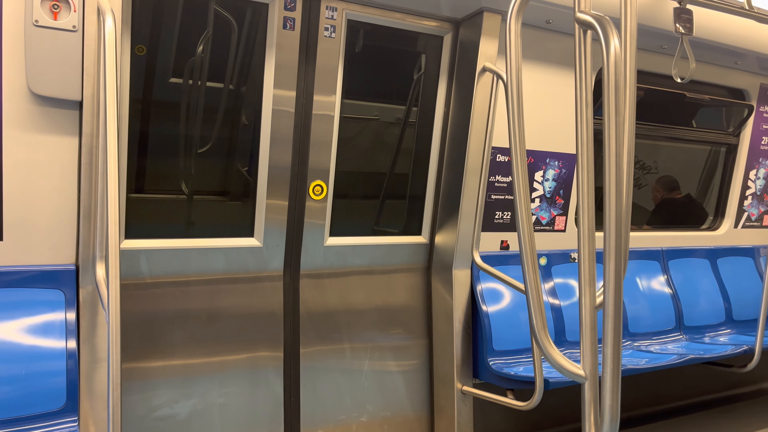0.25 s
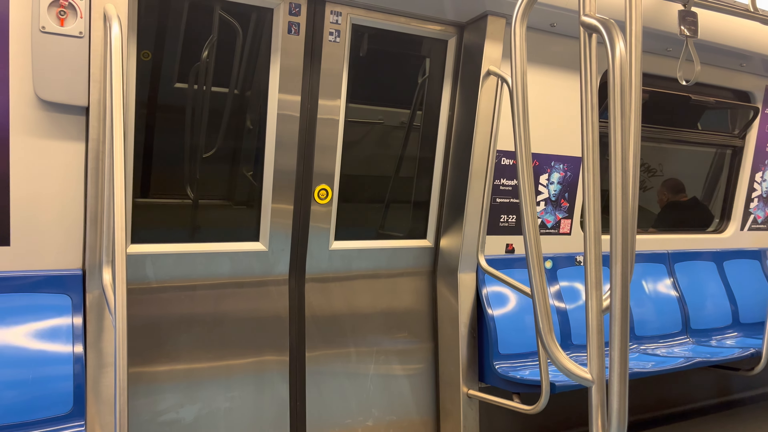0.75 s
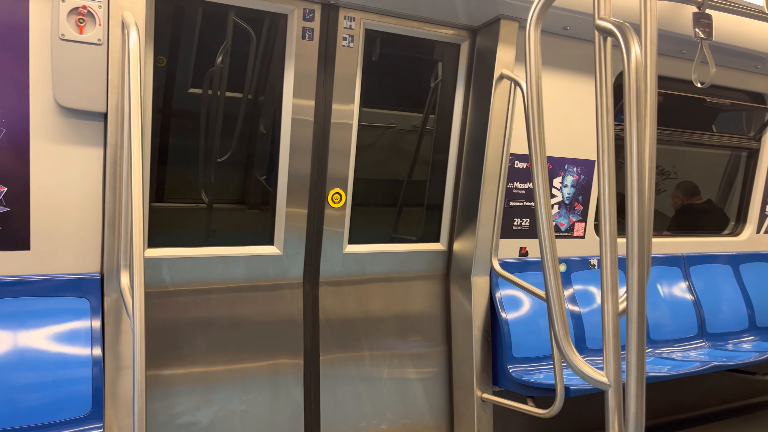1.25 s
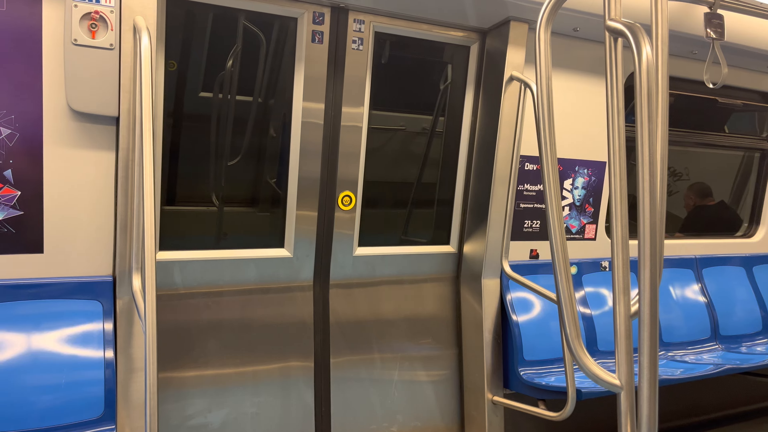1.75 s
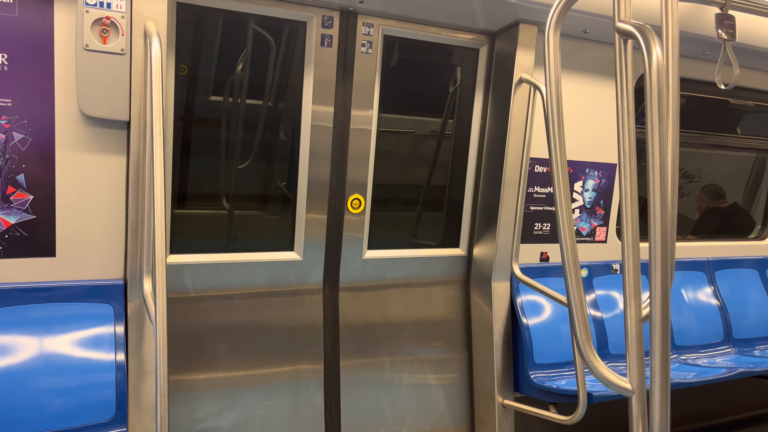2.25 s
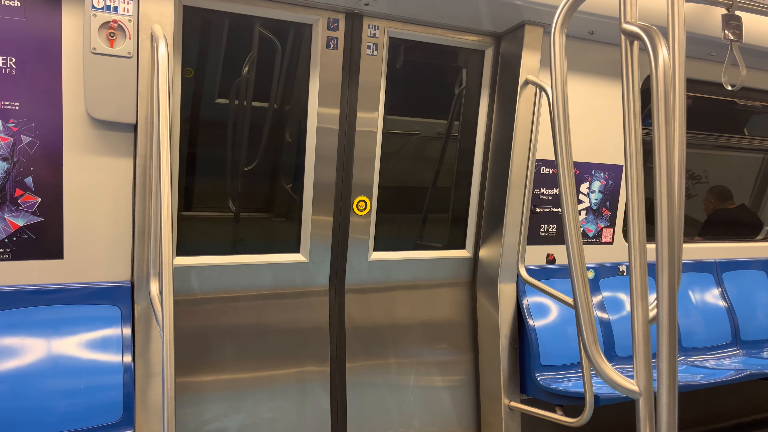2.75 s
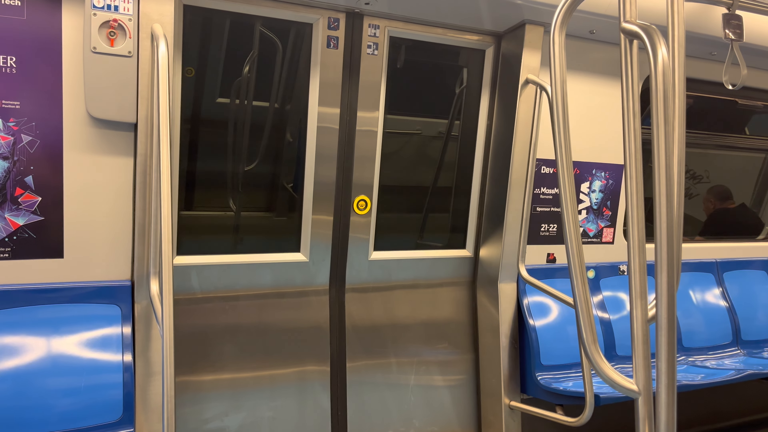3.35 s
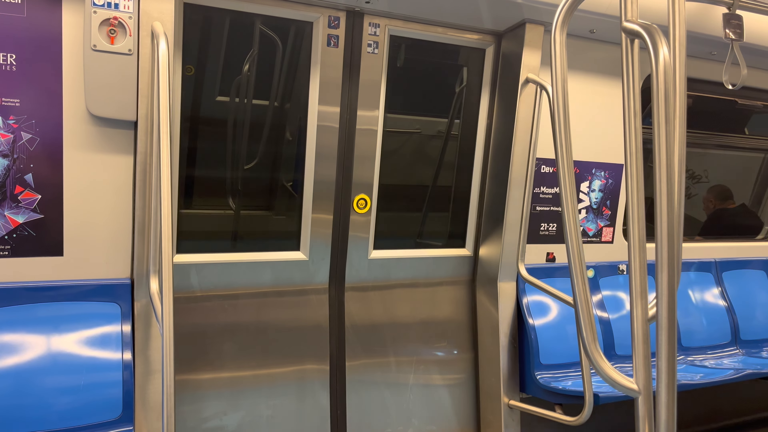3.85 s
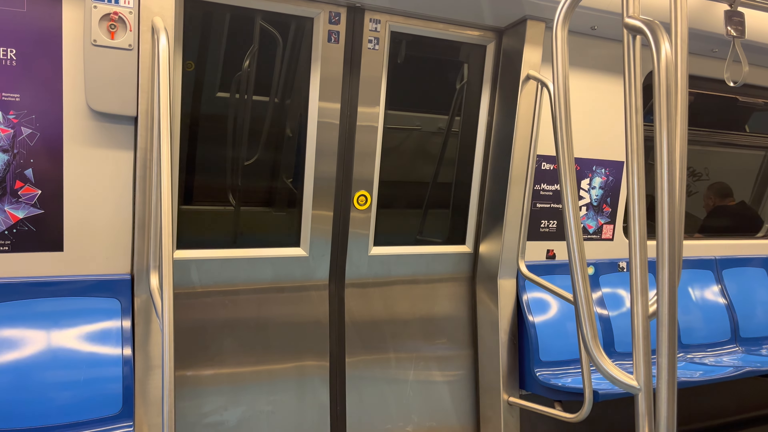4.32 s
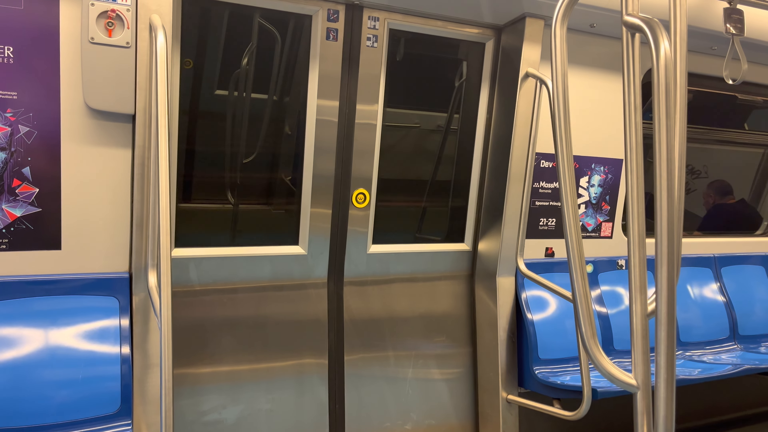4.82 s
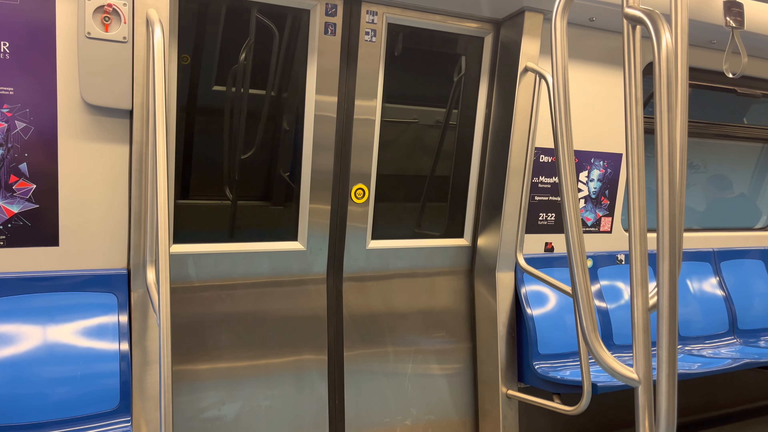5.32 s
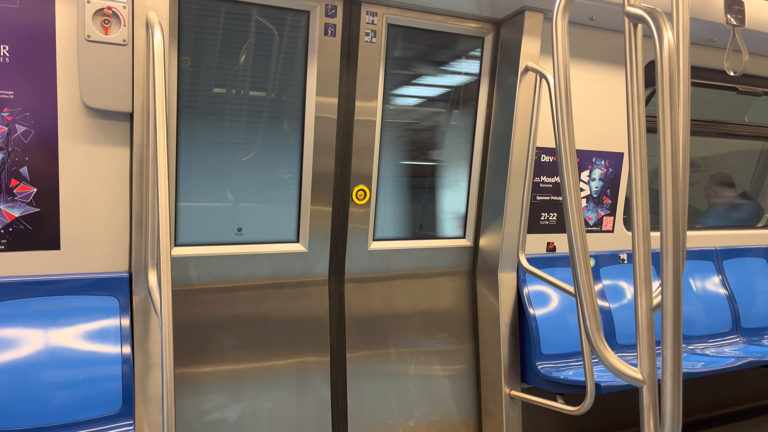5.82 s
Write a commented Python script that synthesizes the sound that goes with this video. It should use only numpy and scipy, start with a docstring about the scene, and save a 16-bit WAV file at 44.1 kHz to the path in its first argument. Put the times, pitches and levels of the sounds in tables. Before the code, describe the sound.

The interior of a metro car running through a tunnel, heard in stereo from a seat facing the closed doors. A continuous deep boom, floor rumble and humming cabin drone dominate, fluttering several times a second. At about 0.1 s a low thud arrives with a burst of rolling roar and air hiss; a softer thud and further swells follow around 0.75-0.95 s. Small resonant jolts keep blooming in the drone, notably near 1.2, 1.8, 2.8 and 4.15 s. Rough rail lifts the wheel noise again around 1.4, 2.1, 2.4 and 3.2 s, with a faint ringing wheel tone, clearest near 3.7 s. From about 4.4 to 4.9 s a puff of hissing air carries a thin, very high whistle that sinks and fades, returning barely audible near 5.6 s. The roar weakens noticeably after 4.9 s as the train eases off, leaving softer rumble until the end at 6 s.

```python
"""A metro car body, shaken by its wheels, booms and drones in a tunnel as the train eases off.
Boom, rumble and drone are noise shaped by the resonances of body, floor and cabin air, with thuds and jolts.
Rolling noise off the tunnel wall comes through the doors and swells on rough rail, where a wheel rings faintly.
Air hisses at the door seals as broad noise in puffs; late on, narrow bands of noise make a thin whistle."""
import sys
import numpy as np
from scipy import signal
from scipy.fft import rfft, irfft, next_fast_len
from scipy.io import wavfile
from scipy.ndimage import uniform_filter1d

SR = 44100
rng = np.random.default_rng(int(sys.argv[2]) if len(sys.argv) > 2 else 0)


def generate_wav(signal):
    """Clip the signal to [-1, 1] and save it as 16-bit WAV at the path in sys.argv[1]."""
    frames = np.transpose(np.atleast_2d(signal))
    scaled = np.clip(frames, -1, 1) * 32767
    pcm = np.round(scaled).astype(np.int16)
    wavfile.write(sys.argv[1], SR, pcm)


N = 268120

TIME = np.arange(N) / SR
SIZE = next_fast_len(N)
HZ = np.maximum(np.arange(SIZE // 2 + 1) * SR / SIZE, 1)
LEFT_RIGHT = np.array([[1], [-1]])
GUST_RATE_HZ = 6.3   # rate at which rolling noise, wheel song and draught waver


def from_db(db):
    """Logarithmic level: decibels to amplitude gain."""
    return 10 ** (np.asarray(db) / 20)


def rms_one(x):
    """Normalisation: scale to unit mean power."""
    return x / np.sqrt(np.mean(x ** 2) + 1e-20)


def in_time(rows):
    """Linear interpolation: each column of a time curve, sample by sample."""
    s, *columns = np.transpose(rows)
    return [np.interp(TIME, s, column) for column in columns]


def over_hz(points, beyond=None):
    """Logarithmic frequency: a table interpolated on a log-frequency axis."""
    hz, value = np.transpose(points)
    return np.interp(np.log(HZ), np.log(hz), value, beyond, beyond)


def colour(spectrum, modes=()):
    """Resonance: the gain of a broad spectrum with Lorentzian power peaks on top."""
    lift = 0
    for hz, width_hz, db in modes:
        lift = lift + (from_db(db) ** 2 - 1) / (1 + (2 * (HZ - hz) / width_hz) ** 2)
    return from_db(over_hz(spectrum, -np.inf)) * np.sqrt(np.abs(1 + lift))


def steady(x, span_s):
    """Power normalisation: hold a noise even over spans longer than span_s."""
    power = np.mean(np.atleast_2d(x) ** 2, axis=0)
    for _ in range(2):
        power = uniform_filter1d(power, max(int(span_s * SR), 2))
    return x / np.sqrt(np.abs(power) + 1e-20)


# Likeness of left and right at each frequency, limited to +-1 in use:
# (frequency [Hz], correlation [-])
STEREO_LIKENESS = [(60, 0.97), (120, 0.97), (260, 0.82), (420, 0.8), (520, 0.53), (620, -0.073),
                   (730, -0.55), (880, 0.2), (1030, -0.15), (1200, 0.17), (1610, -0.38), (1740, 0.48),
                   (3000, 0.31), (6000, 0.19), (7200, -0.24), (8400, -2), (10000, 0.27), (11500, 1),
                   (13000, .7), (14400, .2)]
# Door side, on the left, mostly louder in the treble: (frequency [Hz], left minus right [dB])
DOOR_SIDE_BALANCE = [(100, 0), (230, -2), (290, 0.2), (380, 0.6), (540, -2), (780, 0.2), (1050, 2.2),
                     (1350, -2.5), (1600, -3.5), (1720, 4), (2050, 3), (2450, 0.2), (4200, 3), (7000, 0.5)]


def noise(gain, span_s=0.71, lead_ms=0, door_side=True):
    """Coherence: coloured unit-power noise partly shared by left and right; the left leads by lead_ms."""
    mid, side = rfft(rng.standard_normal((2, SIZE)))
    alike = np.clip(over_hz(STEREO_LIKENESS), -1, 1)
    pair = np.sqrt(1 + alike) * mid + np.sqrt(1 - alike) * side * LEFT_RIGHT
    delay = np.exp(1j * np.pi * HZ * LEFT_RIGHT * lead_ms / 1000)
    balance_db = over_hz(DOOR_SIDE_BALANCE) if door_side else 0
    pan = from_db(LEFT_RIGHT * balance_db / 2)
    return steady(irfft(pair * gain * delay * pan, SIZE)[:, :N], span_s)


def narrow_tone(pitch_hz, half_width_hz):
    """Quadrature modulation: uneven driving smears a moving pitch into a narrow band of unit power."""
    smear = signal.butter(1, half_width_hz, fs=SR, output="sos")
    waver = rms_one(signal.sosfilt(smear, rng.standard_normal((2, N))))
    phase = 2 * np.pi * np.cumsum(pitch_hz) / SR
    return waver[0] * np.cos(phase) + waver[1] * np.sin(phase)


def swell(s, length_s, release=1):
    """Gaussian envelope: a rise to 1 at time s; the fall is release times as long."""
    return np.exp(-((TIME - s) / np.where(TIME < s, length_s, length_s * release)) ** 2)


def judder(rate_hz, depth_db):
    """Random modulation: level changes in dB whose spectrum peaks at rate_hz; depth_db is their RMS."""
    band = (HZ / rate_hz) * np.exp(-HZ / rate_hz)
    shake = irfft(rfft(rng.standard_normal(SIZE)) * band, SIZE)[:N]
    return depth_db * rms_one(shake)


# Rolling effort, falling overall as the train eases off: (time [s], level [dB])
ROLLING_EFFORT = [(0, 1), (1.9, -0.86), (3.0, -2.5), (4.6, -1.5), (4.95, -4.5), (5.5, -6.5), (6.08, -7.5)]


def rolling_gain(level_db, follows, lift_db):
    """Source strength: level_db at 0 dB effort, a share of the effort's changes, and the lift of events."""
    (effort_db,) = in_time(ROLLING_EFFORT)
    return from_db(level_db + follows * effort_db + lift_db)


# Short rises and dips in the level of boom, rumble and drones:
# (time [s], boom change [dB], floor rumble change [dB], cabin drone change [dB], upper drone change [dB])
RISES_AND_DIPS = [(.07, 2, 0, -3, 3.5), (.41, -3, 2, 2, -0.5), (.69, 3, 2.5, -0.5, -1),
                  (.775, 2.5, 1, -2, 4), (1.0, 5, 2.5, 1.5, 2), (1.38, -3, 0, 2, 1),
                  (1.78, 3.5, 4.5, 4, 1.5), (1.88, 6, 4.5, 5.5, 3.5), (2.03, -2, 0, 0, 4),
                  (2.32, 2.5, 0.5, -1.5, 0.5), (2.55, -9, .5, 0.5, 2.5), (2.64, 1, 2.5, 1.5, 4),
                  (2.8, 5, 3.5, -5.5, -0.5), (2.89, 6, 5.5, 1.5, 4), (3.015, 4.5, 2, 5.5, 6.5),
                  (3.09, 3.5, 2, 2.5, -1), (3.19, 4.5, -1, 2, 0.5), (3.29, 0, 2.5, 4, 2),
                  (3.41, 3, 2, 1, 1.5), (3.54, 4, 4, 0.5, 2), (3.71, 5, 3.5, 4, 4.5),
                  (3.88, 3, -3, 0.5, 1.5), (3.94, 6, 4.5, 5, 5), (4.07, -1, 6.5, 4.5, 0),
                  (4.15, 1, 4, 6, 1), (4.375, -3.5, 2.5, 2, 3.5), (4.56, -3, 2, 3, -1.5),
                  (4.66, 1, -0.5, 0, 1.5), (4.79, 1, 0.5, -0.5, 4), (5.06, -3, 4.5, -2, -1.5),
                  (5.18, -6, 4, 3, 1), (5.48, 1, 1, 1.5, 0), (5.73, 0, 1.5, -2, 3), (5.96, 0, 5, 1, 0)]


def rises_and_dips():
    """Level modulation: short rises and dips, each followed by a weaker opposite change just after."""
    half_length_s, opposite_delay_s, opposite_share = 0.043, 0.058, 0.25
    changes = 0
    for s, *changes_db in RISES_AND_DIPS:
        opposite = opposite_share * swell(s + opposite_delay_s, half_length_s)
        changes = changes + np.outer(changes_db, swell(s, half_length_s) - opposite)
    return changes


# Broad spectra of boom, floor rumble, cabin drone and upper drone:
# (frequency [Hz], relative density [dB per Hz])
BOOM_SPECTRUM = [(15, -37), (28, -27), (42, -17.5), (55, 0.5), (82, 0.5), (100, -8), (140, -29)]
RUMBLE_SPECTRUM = [(60, -26), (100, -2), (140, 1.5), (195, 1), (235, 2.5), (300, -12), (450, -32.5)]
DRONE_SPECTRUM = [(200, -28.5), (250, -3.5), (290, -1), (308, -3), (335, -20.5)]
UPPER_DRONE_SPECTRUM = [(280, -24.5), (312, -1), (340, 1.5), (400, -2.5), (470, -5), (550, -16), (800, -28)]
# Resonances of body, floor and cabin air: (frequency [Hz], width [Hz], lift [dB])
BODY_RESONANCES = [(57.4, 21, 4.5), (82.1, 4.2, 11)]
FLOOR_RESONANCES = [(173, 14, 0.62), (217, 16, 6.5)]
CABIN_RESONANCES = [(260, 12, 7), (282.6, 22, 8)]
UPPER_CABIN_RESONANCES = [(313, 7.7, 4), (325, 9.4, 5.6), (334.5, 10, 2), (377, 15, 5.2), (418, 23, 2.7),
                          (443, 21, 0.9)]


def car_body():
    """Forced vibration: the rolling wheels shake the modes of body, floor and cabin air."""
    boom_db, rumble_db, drone_db, upper_db = (
        change_db + judder(rate_hz=7, depth_db=0.53) for change_db in rises_and_dips())
    boom = noise(colour(BOOM_SPECTRUM, BODY_RESONANCES), span_s=0.11)
    rumble = noise(colour(RUMBLE_SPECTRUM, FLOOR_RESONANCES), span_s=0.08)
    drone = noise(colour(DRONE_SPECTRUM, CABIN_RESONANCES), span_s=0.08)
    upper = noise(colour(UPPER_DRONE_SPECTRUM, UPPER_CABIN_RESONANCES), span_s=0.056)
    return (rolling_gain(-32.5, follows=0.45, lift_db=boom_db) * boom
            + rolling_gain(-28.5, follows=0.081, lift_db=rumble_db) * rumble
            + rolling_gain(-25, follows=0.54, lift_db=drone_db) * drone
            + rolling_gain(-23, follows=1.0, lift_db=upper_db) * upper)


# Broad spectrum of the sway: (frequency [Hz], relative density [dB per Hz])
SWAY_SPECTRUM = [(14, -32.5), (28, -14), (40, -2), (50, -2.5), (64, -23)]
# Its course: (time [s], level [dB])
SWAY_COURSE = [(0, -43), (.35, -42), (.6, -40), (.9, -38), (1.3, -44), (1.7, -56), (3.3, -57), (3.6, -45.5),
               (4.3, -51), (4.75, -40), (5.2, -48.5), (6.08, -46)]


def sway():
    """Suspension motion: the whole car heaves on its springs, a deep noise under the boom."""
    (level_db,) = in_time(SWAY_COURSE)
    return from_db(level_db) * noise(colour(SWAY_SPECTRUM), span_s=0.15, door_side=False)


# Stretches of rough rail: (time of the height [s], length [s], tunnel roar lift [dB],
# wheel noise lift [dB], rail hiss lift [dB], wheel song lift [dB])
ROUGH_STRETCHES = [(0.088, 0.085, 7, 10.5, 11, 8), (0.304, 0.075, 0, 2, 2, -3),
                   (0.758, 0.064, 5, 5.5, 3, 10), (0.939, 0.11, 5, 7.5, 6, 10),
                   (1.426, 0.15, 2, 6.5, 3, 8.5), (2.127, 0.083, 2.5, 5, 1.5, 9.5),
                   (2.42, 0.17, 1.7, 4.5, 4, 9.5), (3.152, 0.41, 0, 3.5, 2, -3.5),
                   (3.72, 0.18, 2, 3.1, 2.5, 13.5), (4.033, 0.077, 1.5, 3, 1, 0),
                   (4.274, 0.13, 0, 1.5, 1, 6), (4.62, .15, -1.5, 0.5, 0.5, 0),
                   (5.242, 0.081, -0.5, 2, 1.5, 5), (6.04, 0.24, .5, 1, -1.5, 1.5)]


def rough_rail():
    """Roughness excitation: dB lifts of roar, wheel noise, rail hiss (a little late) and wheel song."""
    lags_s = (0, 0, 0.042, 0)
    ring_on = 2.01   # the tunnel makes a swell die this many times slower than it grows
    lifts = 0
    for s, length_s, *lifts_db in ROUGH_STRETCHES:
        lifts = lifts + np.array([lift_db * swell(s + lag_s, length_s, ring_on)
                                  for lift_db, lag_s in zip(lifts_db, lags_s)])
    return lifts


def standing_waves(depth_db, spacing_hz, blur_hz):
    """Modal overlap: many close cabin modes ripple the spectrum and even out above blur_hz."""
    count = max(int(spacing_hz * SIZE / SR), 2)
    ripple = uniform_filter1d(uniform_filter1d(rng.standard_normal(len(HZ)), count), count)
    return from_db(depth_db * rms_one(ripple) / np.sqrt(1 + (HZ / blur_hz) ** 2))


# Broad spectra of tunnel roar, wheel noise and rail hiss: (frequency [Hz], relative density [dB per Hz])
ROAR_SPECTRUM = [(330, -10), (500, 2), (620, 1), (780, 0.5), (980, -0.5), (1270, -3.5), (1500, -11),
                 (1800, -21.5), (2600, -37)]
WHEEL_SPECTRUM = [(1200, -22), (1500, -0.5), (1650, 1), (1800, 0), (2050, 0.5), (2250, -5.5), (2500, -6),
                  (2700, -11), (3000, -12.5), (4000, -35.5)]
RAIL_SPECTRUM = [(1900, -18.5), (2650, 2.5), (2870, 5.2), (3600, 2.5), (4300, -1), (5200, -5.5),
                 (6300, -13), (7400, -15), (8500, -57.5), (12000, -50.5)]
# Resonances of doors, wheel discs and rail: (frequency [Hz], width [Hz], lift [dB])
DOOR_RESONANCES = [(758, 70, 2.8), (903, 70, 2.2), (1030, 78, 2.1)]
WHEEL_RESONANCES = [(1600, 78, 3.5), (1700, 60, 2.6), (1950, 70, 1.7), (2400, 100, 6.9)]
RAIL_RESONANCES = [(2900, 38, 4.6), (3470, 120, 1.5), (3770, 44, 2.3), (4280, 160, 2.2), (5583, 50, 1),
                   (6560, 43, 5.8)]


def wheels_on_rail():
    """Rolling contact: roar off the tunnel wall, ringing wheel discs and hissing rail, all through the doors."""
    roar_db, wheel_db, rail_db, _ = rough_rail() + judder(GUST_RATE_HZ, depth_db=0.63)
    cabin = standing_waves(depth_db=1.1, spacing_hz=13, blur_hz=2500)
    roar = noise(cabin * colour(ROAR_SPECTRUM, DOOR_RESONANCES))
    wheel = noise(cabin * colour(WHEEL_SPECTRUM, WHEEL_RESONANCES), lead_ms=0.03)
    rail = noise(cabin * colour(RAIL_SPECTRUM, RAIL_RESONANCES), lead_ms=0.015)
    return (rolling_gain(-28.5, follows=1, lift_db=roar_db) * roar
            + rolling_gain(-44, follows=0.83, lift_db=wheel_db) * wheel
            + rolling_gain(-49, follows=1.0, lift_db=rail_db) * rail)


# The wheel song wanders in pitch: (time [s], pitch [Hz])
SONG_COURSE = [(0, 1975), (1.4, 1965), (2.2, 2000), (3.0, 1985), (3.8, 1960), (4.2, 1988), (5.2, 1955)]


def wheel_song():
    """Light damping: one wheel mode rings in a narrow band, swelling on rough rail, on the door side."""
    *_, song_db = rough_rail()
    (pitch_hz,) = in_time(SONG_COURSE)
    gain = rolling_gain(-57.5, follows=0.44, lift_db=song_db + judder(GUST_RATE_HZ, depth_db=1))
    tone = steady(narrow_tone(pitch_hz, half_width_hz=3.3), span_s=0.4)
    left_minus_right_db = 4.5
    return gain * tone * from_db(LEFT_RIGHT * left_minus_right_db / 2)


# Broad spectrum of the seal hiss: (frequency [Hz], relative density [dB per Hz])
SEAL_SPECTRUM = [(3000, -8.5), (6000, 5), (7400, 4.5), (9500, 4), (10600, 1), (11700, -0.5), (12800, -6),
                 (13600, -5), (14400, -11.5)]
# Resonances of the gap in the door seal: (frequency [Hz], width [Hz], lift [dB])
SEAL_RESONANCES = [(9100, 200, 0.5), (10500, 250, 2), (12700, 550, 2.5)]
# Puffs of air through the door seals: (time [s], length [s], lift [dB])
AIR_PUFFS = [(0.107, .07, 12), (0.762, 0.035, 5), (.92, 0.066, 7), (1.1, 0.033, 3), (1.328, 0.056, 8.5),
             (1.8, .18, 3.5), (2.16, .06, 2), (3.09, .06, 4), (3.26, 0.053, 5), (3.837, 0.14, 4.5),
             (4.485, 0.061, 5.5), (4.686, 0.17, 9), (5.05, .08, 2.5), (5.58, .15, 0)]


def air_leak():
    """Turbulent flow: a narrow leak hisses unevenly, more strongly in puffs."""
    # a puff dies 1.25 times slower than it grows
    puff_db = sum(lift_db * swell(s, length_s, release=1.25) for s, length_s, lift_db in AIR_PUFFS)
    gain = rolling_gain(-65, follows=0.59, lift_db=puff_db + judder(GUST_RATE_HZ, depth_db=0.5))
    return gain * noise(colour(SEAL_SPECTRUM, SEAL_RESONANCES), door_side=False)


# Hard knocks that set the body humming: (time [s], pitch [Hz], peak level [dB], ring length [s])
BODY_KNOCKS = [(0.088, 73, -19.5, 0.18), (0.892, 77, -28, 0.4)]


def thuds():
    """Impulse response: a hard knock from the track quickly starts the body's low mode and leaves it humming."""
    rise_s = 0.014
    hum = 0
    for s, hz, db, ring_s in BODY_KNOCKS:
        tone = np.sin(2 * np.pi * (hz * TIME + rng.random()))
        hum = hum + from_db(db) * swell(s, rise_s, ring_s / rise_s) * tone
    return hum


# Rough patches that set one mode of the cabin air ringing:
# (time [s], pitch [Hz], peak level [dB], length of the rise [s])
CABIN_JOLTS = [(0.482, 281.3, -23.5, 0.1), (0.63, 335, -30, 0.034), (0.744, 268, -19, 0.072),
               (0.955, 337, -27, 0.11), (1.13, 325.3, -21, 0.034), (1.226, 272.1, -19, 0.051),
               (1.568, 336.3, -20.5, 0.093), (1.788, 270.6, -15, 0.029), (1.88, 336.6, -18.5, 0.015),
               (2.308, 338, -20, 0.023), (2.392, 283, -23.5, 0.055), (2.58, 286, -20, 0.038),
               (2.795, 222, -22.5, 0.023), (3.26, 287, -23.5, 0.016), (3.296, 330.5, -21, 0.057),
               (3.544, 338, -18.5, 0.035), (3.825, 277, -25.5, 0.034), (4.152, 286, -15.5, 0.034),
               (4.43, 293, -27, 0.11), (4.553, 321.8, -17.5, 0.019), (4.582, 285, -25, 0.007),
               (4.802, 277, -21.5, 0.038), (5.204, 274, -22.5, 0.027)]


def jolts():
    """Transient excitation: at each rough patch of track one cabin mode swells and dies."""
    release = 2.07   # the ringing dies this many times slower than it grows
    ringing = 0
    for s, hz, db, length_s in CABIN_JOLTS:
        tone = np.sin(2 * np.pi * (hz * TIME + rng.random()))
        ringing = ringing + from_db(db) * swell(s, length_s, release) * tone
    return ringing


# The whistle's course, sinking overall: (time [s], pitch [Hz], level before the partials' own [dB])
WHISTLE_COURSE = [(4.25, 13020, -105), (4.39, 12970, -77), (4.49, 12860, -65.5), (4.535, 12800, -70),
                  (4.63, 12790, -63), (4.81, 12560, -65), (4.93, 12390, -75), (5.1, 12350, -100),
                  (5.48, 12600, -88), (5.63, 12450, -75), (5.95, 12300, -100)]
# Its partials: (ratio to the pitch [-], half width [Hz], level [dB])
PARTIALS = [(.825, 70.3, -6), (1, 95, 0.5), (1.05, 221, -9)]


def seal_whistle():
    """Aeroacoustic tone: turbulence flutters a rough whistle that swells, sinks, fades and returns faintly."""
    pitch_hz, level_db = in_time(WHISTLE_COURSE)
    tones = sum(from_db(db) * narrow_tone(ratio * pitch_hz, half_width_hz)
                for ratio, half_width_hz, db in PARTIALS)
    return tones * from_db(level_db + judder(rate_hz=14, depth_db=1))


def scene():
    """Superposition: everything heard from a seat opposite the doors."""
    structure = car_body() + sway() + thuds() + jolts()
    rolling = wheels_on_rail() + wheel_song()
    air = air_leak() + seal_whistle()
    return structure + rolling + air


def record(dry):
    """Low-pass filtering: an elliptic filter cuts the top steeply."""
    cutoff_hz = 14400
    return signal.sosfilt(signal.ellip(10, 0.1, 80, cutoff_hz, fs=SR, output="sos"), dry)


dry = scene()
out = record(dry)
generate_wav(out)
```